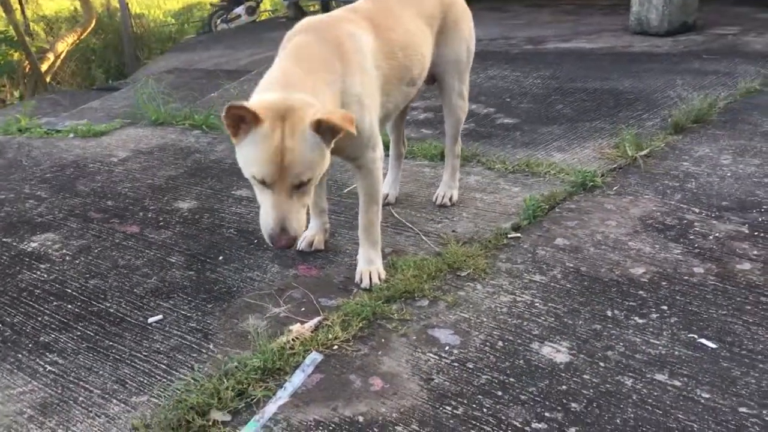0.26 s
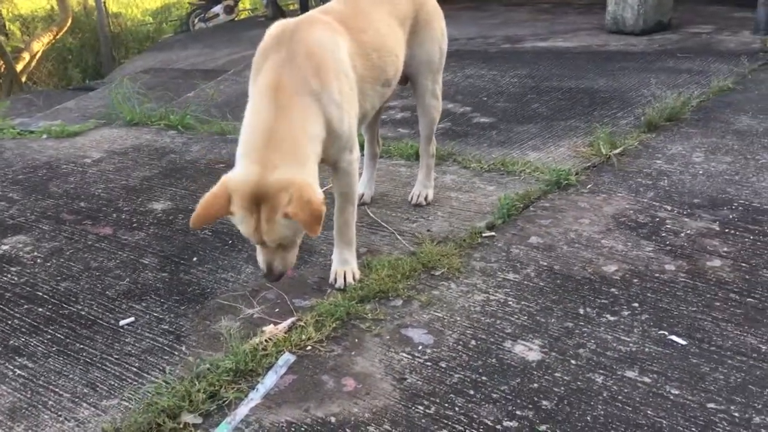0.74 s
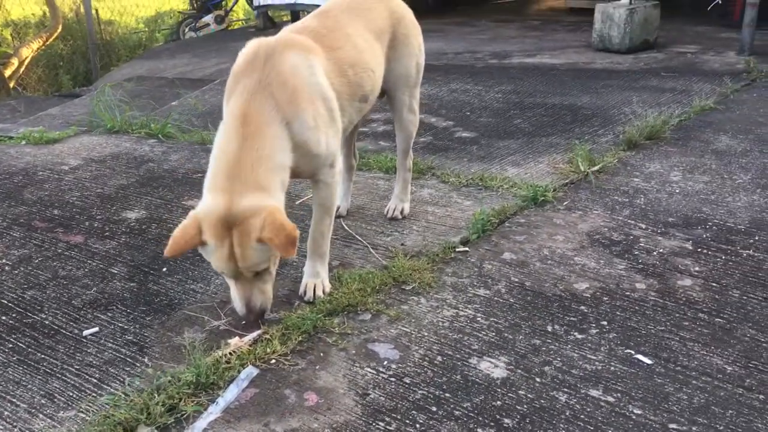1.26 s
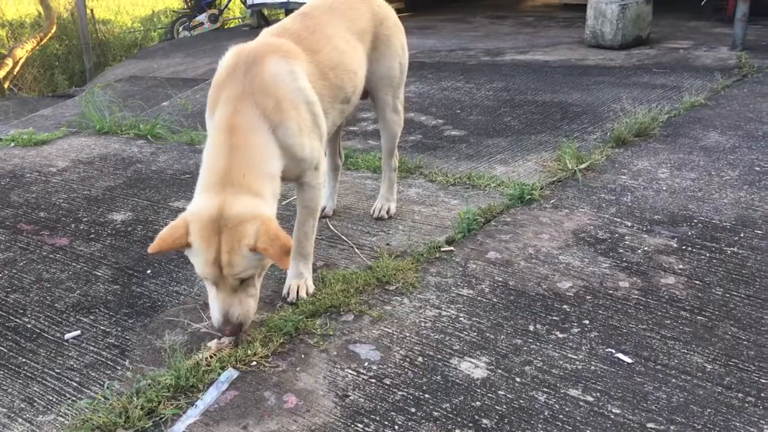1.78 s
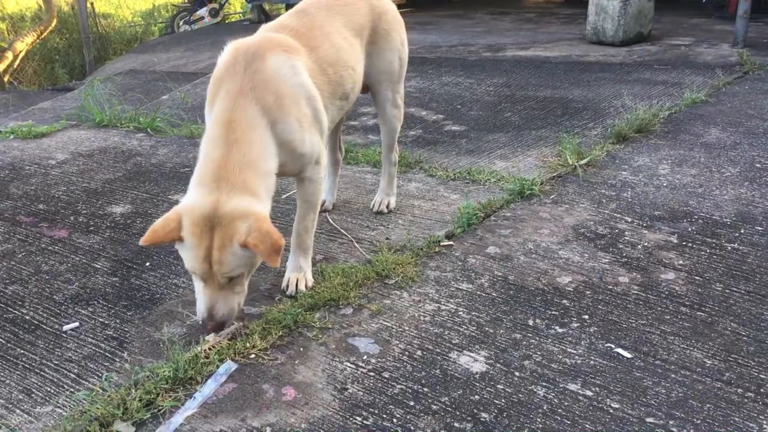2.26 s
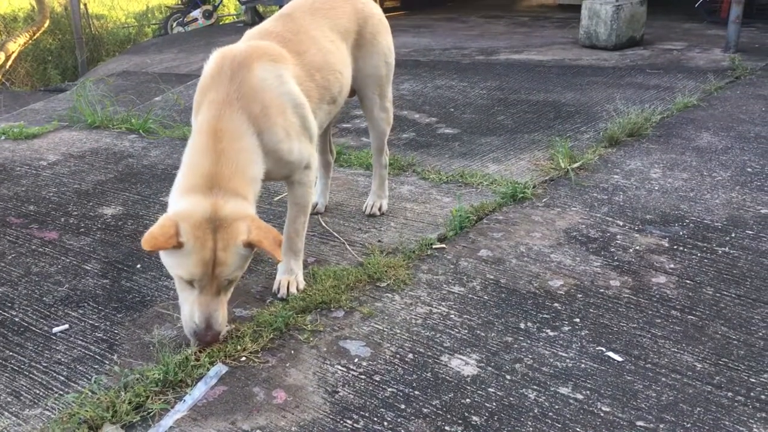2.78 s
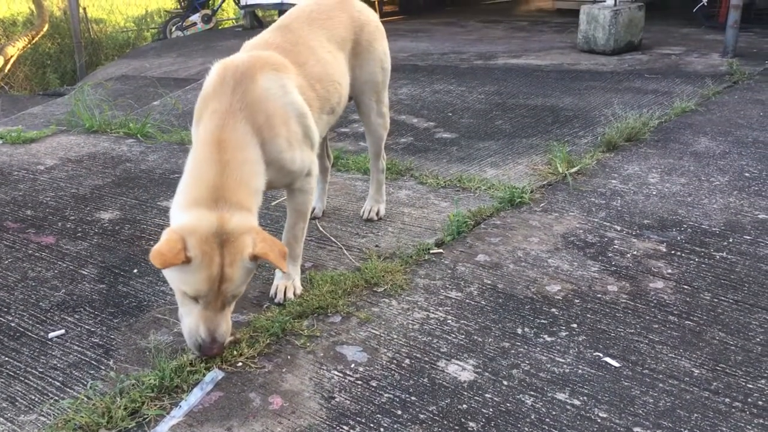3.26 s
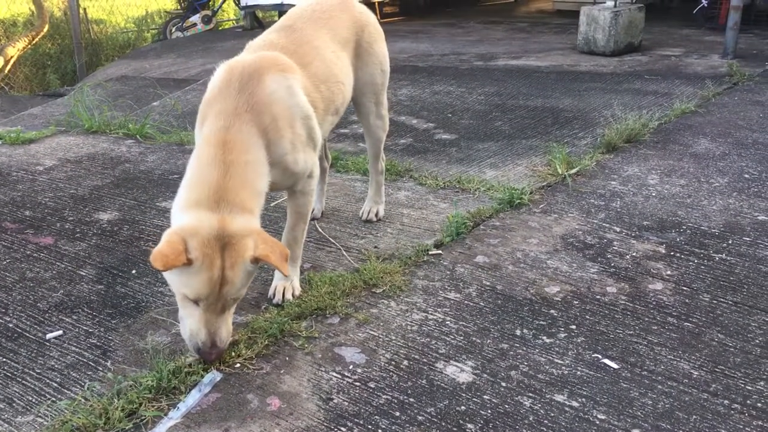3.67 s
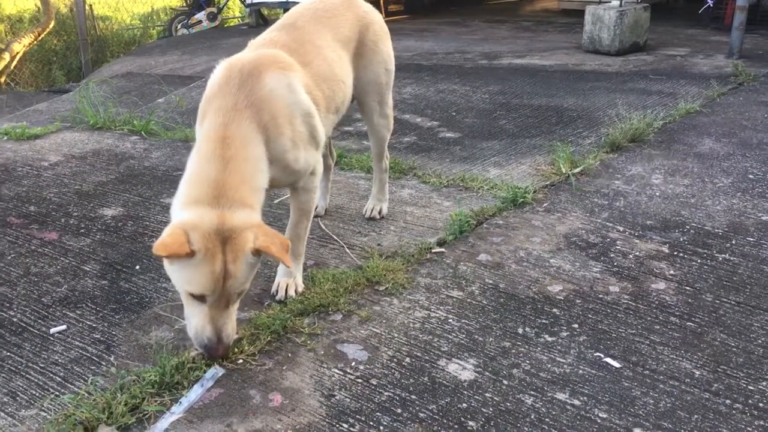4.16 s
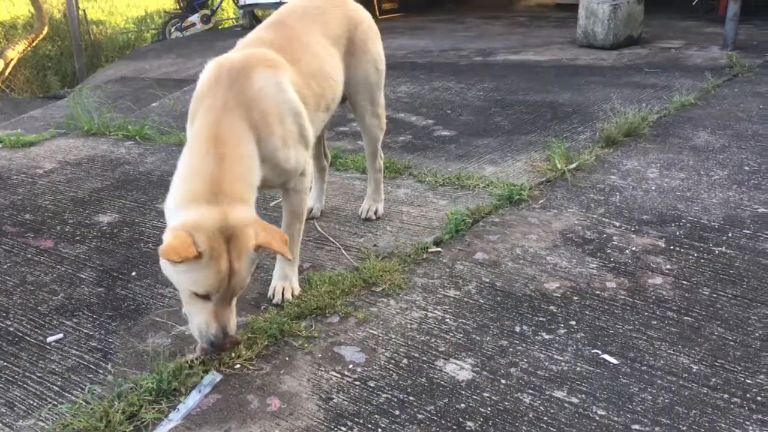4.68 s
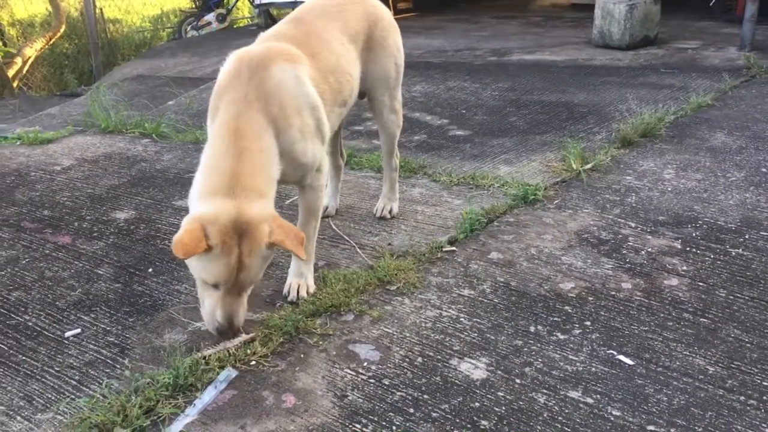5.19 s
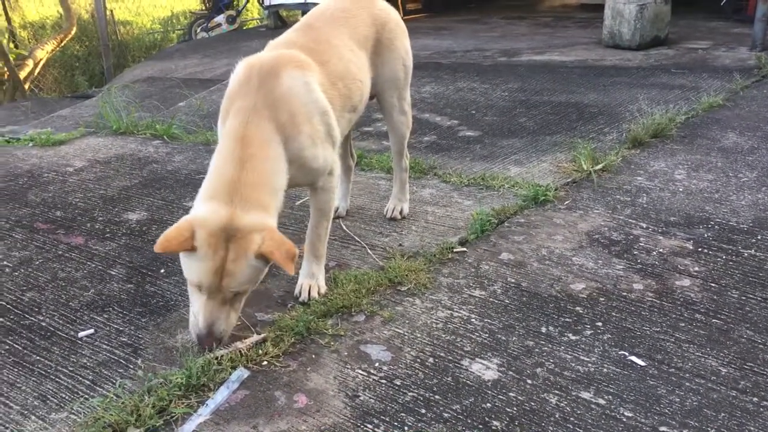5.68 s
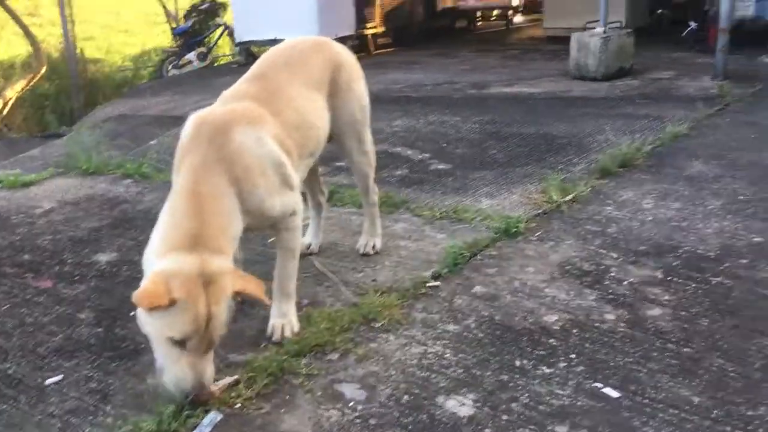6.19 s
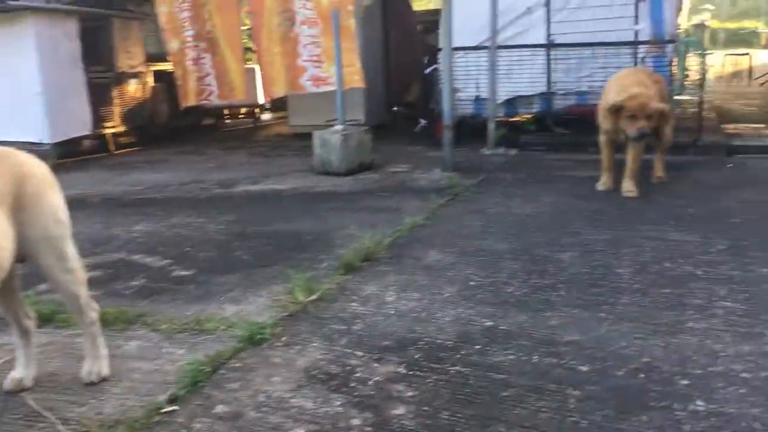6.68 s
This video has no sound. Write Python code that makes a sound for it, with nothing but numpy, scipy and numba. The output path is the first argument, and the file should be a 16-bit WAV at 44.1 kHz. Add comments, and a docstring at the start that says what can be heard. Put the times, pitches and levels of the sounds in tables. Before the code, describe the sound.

In a concrete yard, a dog nosing at scraps makes a few small dry clicks close to the microphone. Further off under a shed roof, a hollow object is knocked about in irregular clusters, with slaps and loose metal rattle, loudest past two and a half seconds and again past five. A bird whistles twice; a faint motor hum, rumble and insect hiss continue throughout.

```python
"""Small dry mouth clicks come first, close by: a dog noses at scraps in a concrete yard.
Further off, under a shed roof, something hollow is knocked, dragged and dropped among metal parts:
bursts of noise make its hollow body, its slap and the loose metal ring. A bird made of gliding
whistles calls twice, with fainter bird notes behind. A motor hums in wavering tones, and shaped
noise makes the distant rumble and the insects' hiss."""
import sys
import numpy as np
from scipy import signal
from scipy.fft import rfft, irfft
from scipy.io import wavfile
from scipy.ndimage import uniform_filter1d
from numba import njit

SR = 44100
rng = np.random.default_rng(int(sys.argv[2]) if len(sys.argv) > 2 else 0)


def wrap_up_sound(samples):
    """Save the sound to the file named by the first command line argument, as 16-bit audio."""
    columns = np.atleast_2d(samples).T
    # keep every value between -1 and 1, then stretch to whole-number steps
    tamed = np.clip(columns, -1, 1)
    steps = np.round(tamed * 32767).astype(np.int16)
    wavfile.write(sys.argv[1], SR, steps)


N = 306054
T = np.arange(N) / SR  # time, s


def undb(db):
    """Turn decibels into a plain amplitude factor."""
    return 10 ** (np.asarray(db) / 20)


def unit(x):
    """Scale to an rms of 1."""
    return x / np.sqrt(np.mean(x ** 2))


def colour(x, table):
    """Shape the spectrum along (f/Hz, level/dB) points."""
    hz, db = np.transpose(table)
    f = np.maximum(np.fft.rfftfreq(len(x), 1 / SR), 1)
    return irfft(rfft(x) * undb(np.interp(np.log(f), np.log(hz), db)), len(x))


@njit
def svf(x, hz, width):
    """State-variable band-pass with a moving centre, gain 1 at the centre."""
    y, b, l = np.empty(len(x)), 0., 0.
    for i in range(len(x)):
        g, k = np.tan(np.pi * hz[i] / SR), width / hz[i]
        v = (b + g * (x[i] + 1e-18 - l)) / (1 + g * (g + k))
        b, l, y[i] = 2 * v - b, l + 2 * g * v, k * v
    return y


def band(x, hz, width):
    """Band-pass with a fixed centre; a narrow band rings longer."""
    return svf(x, np.full(len(x), np.clip(hz, 20., .45 * SR)), max(1. * width, 5.))


def bank(x, peaks, struck_db=0):
    """Resonances side by side, neighbours in opposite phase; struck_db gives each its momentary share."""
    shares = np.broadcast_to(undb(struck_db), (len(peaks), len(x)))
    out = 0
    for k, (hz, width, db) in enumerate(peaks):
        out = out + (-1) ** k * undb(db) * band(x * shares[k], hz, width)
    return out


def walk(rate):
    """Random levels held 1 / rate s and slewed twice; spread near 1."""
    k = int(SR / rate)
    steps = np.repeat(rng.standard_normal(N // k + 1), k)
    return 1.28 * uniform_filter1d(uniform_filter1d(steps, k), k)[:N]


def grit(scatter_db):
    """Dense contacts whose sizes have a long tail."""
    return unit(rng.standard_normal(N) * undb(scatter_db * rng.exponential(size=N)))


# thump level of a middling knock, dB of thump per dB of knock, and the level of that middling knock
THUMP_DB, THUMP_SLOPE, MIDDLE_KNOCK_DB = -51, 0.55, -39
THUMP_PER_RATTLE = 0.22  # dB of thump per dB of rattle: what shakes the metal also lands heavily
FINE_RATTLE_DB, FINE_SLOPE = -7, .95  # fine rattle: offset in dB, and dB per dB of coarse rattle
# Knocks on the hollow thing; slap and rattle are relative to the knock's drive level:
# [t/s, drive level/dB, cavity f/Hz, slap level/dB, metal rattle level/dB, fading time/ms (at least 5)]
KNOCK_LIST = [(.74, -41.5, 830, -13, -34, 41), (.935, -44.5, 727, -22, -25, 19),
              (1.003, -45, 746, -20, -21, 16), (1.03, -48, 792, -17, -11, 29),
              (1.05, -42, 735, -22, -25, 25), (1.09, -42, 740, -21, -32, 23),
              (1.122, -42.5, 730, -22, -24, 14), (1.208, -46, 830, -23, -25, 26),
              (1.25, -31, 704, -23, -29, 13), (1.263, -28, 718, -4.5, -17.5, 15.7),
              (1.286, -32, 725, -9, -21, 16), (1.309, -41.5, 740, -6, -19, 54),
              (1.427, -34.5, 746, -9, -23, 40), (1.456, -29.5, 730, -5, -23.5, 25.6),
              (1.489, -47, 820, -8, -23, 26), (1.545, -34.5, 790, -0.5, -9, 25),
              (1.58, -38, 750, -10, -26, 23), (2.079, -37.5, 747, -7, -15.5, 42),
              (2.214, -40.5, 730, -15, -27, 29), (2.236, -39.5, 770, -3.5, -13.5, 39),
              (2.326, -42, 840, -10, -12, 300), (2.379, -33.5, 641, -7, -7.5, 39),
              (2.43, -35, 644, -19, -8, 12), (2.481, -36.5, 786, -7, -24, 68),
              (2.51, -40.5, 710, 1, -18, 220), (2.562, -33.5, 768, -18, -2.5, 26),
              (2.603, -33.5, 900, -3, -8, 40), (2.624, -28, 700, -2.7, -9.5, 55),
              (2.65, -20.5, 630, 3, 1.9, 15), (2.668, -27, 789, -1, -10.5, 43),
              (2.77, -35, 785, -1, -12, 60), (2.857, -48, 625, -0.5, -6, 135),
              (2.939, -53, 720, -9, -7, 30), (3.051, -45, 673, -21, -12, 13),
              (3.105, -45, 880, -4, -10, 35), (3.26, -45, 646, -9, -17, 56),
              (3.328, -49.5, 940, -4, -13, 74), (3.719, -47.5, 746, -1.5, -14, 32),
              (3.75, -43.5, 783, -6.5, -18, 120), (3.779, -35, 700, -12.5, -23, 36),
              (3.809, -32.5, 743, -13, -23, 19), (3.847, -30.5, 830, -8, -18.5, 21),
              (3.88, -34, 730, -6, -25, 29), (3.924, -35.5, 744, -1, -18, 23),
              (3.997, -39, 766, -11, -19, 27), (4.06, -40.5, 756, -9, -23, 26),
              (4.083, -44, 730, 0.5, -11, 44), (4.144, -32.5, 722, -13, -24, 57),
              (4.179, -32, 720, -5.5, -21, 25), (4.239, -32, 725, -5.5, -22, 24),
              (4.267, -31, 793, -6, -26, 12), (4.505, -58, 640, 5.5, 3, 40),
              (4.657, -43, 626, -18, -27, 12), (4.808, -56, 800, 6.5, -17, 32),
              (4.923, -59, 899, -14, 11.5, 41), (4.96, -46.5, 690, -1, -2.5, 22),
              (4.978, -37.5, 660, -9, -24, 74), (5.064, -36, 770, -11, -26, 38),
              (5.11, -45.5, 740, -7, -18, 53), (5.171, -34, 655, -3.5, -30, 36),
              (5.184, -21.5, 812, -1.7, -7, 25.7), (5.218, -21.5, 727, -6, -38, 24),
              (5.238, -24, 710, 4.5, -9.5, 16), (5.252, -23, 730, -1, -10.5, 16),
              (5.298, -26.5, 688, 0.3, -12, 31), (5.34, -35, 677, -1.2, -21, 19),
              (5.382, -29.5, 719, -2.5, -20.5, 24.7), (5.458, -49, 720, -2, -5, 83),
              (5.527, -49, 654, 1, -1.5, 41), (5.595, -37.5, 690, -11, -27, 28),
              (5.988, -48.5, 780, -2, -7, 22), (6.045, -43.5, 660, -4, -9.5, 29),
              (6.073, -41.5, 693, -1.5, -13.5, 28), (6.159, -54, 635, 1.7, -8.5, 150)]


def knocks():
    """Each knock is a blow and a fading rattle of contacts that drive the cavity, the shell and loose metal."""
    s, db, hz, slap_db, metal_db, length_ms = np.transpose(KNOCK_LIST)
    # the weight that lands grows more slowly than the knock
    thump_db = THUMP_DB + THUMP_SLOPE * (db - MIDDLE_KNOCK_DB) + THUMP_PER_RATTLE * metal_db
    fine_db = FINE_SLOPE * metal_db + FINE_RATTLE_DB
    levels_db = np.array([db, db + slap_db, db + metal_db, db + fine_db, thump_db])
    # build-up times in s: the loose metal takes longer to start chattering than the shell
    gather = np.array([[.003], [.004], [.007], [.007], [.005]])
    power, blow = np.zeros((5, N)), np.zeros(N)
    for k in range(len(s)):
        i = int((s[k] - .004) * SR)
        age = T[:min(SR // 2, N - i)]
        fade = np.exp(-(age / max(length_ms[k] / 1000, .005)) ** 0.92)
        shape = (1 - np.exp(-age / gather)) * fade
        power[:, i:i + len(age)] += (undb(levels_db[:, k:k + 1]) * shape) ** 2
        blow[i:i + 24] += undb(db[k]) * np.hanning(24)
    push = np.sqrt(power) * undb(1.64 * walk(150))
    body_push, slap_push, coarse_push, fine_push, thump_push = push

    # which knock came last, at every sample
    now = np.clip(np.searchsorted(s - .004, T) - 1, 0, None)
    # every knock lands elsewhere, so it wakes the modes in other shares
    struck = rng.standard_normal((len(s), len(HOLLOW_MODES) + len(METAL_MODES))).T[:, now]
    hollow_struck, metal_struck = struck[:len(HOLLOW_MODES)], struck[len(HOLLOW_MODES):]
    slap_blow = undb(slap_db[now]) * np.gradient(blow)
    return (hollow_thing(body_push, slap_push, thump_push, blow, hz[now], hollow_struck)
            + slap(body_push, slap_push, slap_blow)
            + loose_metal(coarse_push, fine_push, metal_struck))


# Notes the hollow shell rings at: [f/Hz, width/Hz, relative level/dB]
HOLLOW_MODES = [(237.4, 9.5, -10), (319, 47, -7.5), (356, 46, -13.5), (447, 25, -18.5), (587, 42, -14),
                (666, 48, -7), (729, 18.5, -3.5), (792.5, 23, -5.5), (828, 41, -10.5), (974, 40, -15.5),
                (1053, 19.4, -7.5), (1146, 21.4, -7.5), (1216, 18, -6.5), (1312, 21, -13),
                (1600, 3.1, -12.5), (1690, 53, -10.5), (1833, 33, -12.5), (1850, 58, -10),
                (1990, 38, -13.5), (2094, 65, -12.5), (2360, 47, -15), (2565, 85, -16), (2827, 26, -15.5),
                (3045, 30, -11), (3070, 22, -40)]


def hollow_thing(body_push, slap_push, thump_push, blow, cavity_hz, struck):
    """The air inside rings at one moving pitch, the shell around it at many fixed ones."""
    body = body_push * grit(1.13) + undb(2.5) * blow
    # the cavity pitch steps from knock to knock as the thing tilts
    cavity = svf(body, cavity_hz, 43.5) * undb(15.0)
    split = sum(mode[0] < 1400 for mode in HOLLOW_MODES)
    middle = bank(body, HOLLOW_MODES[4:split], 3 * struck[4:split]) * undb(16.5)
    # the deepest modes answer to the weight that lands on the ground
    thump = thump_push * grit(2.1)
    deep = bank(thump, HOLLOW_MODES[:4], 3 * struck[:4]) * undb(32.5)
    deep += band(band(thump, 200, 230), 206, 330) * undb(16.5)
    high = bank(slap_push * grit(2.88), HOLLOW_MODES[split:], 4 * struck[split:]) * undb(17.5)
    return cavity + middle + deep + high


# Tone colour of the dull contact noise: [f/Hz, relative level/dB per Hz]
SLAP_COLOUR = [(71, -53), (120, -23), (341, -3.5), (524, -10.5), (712, -13), (1460, -8.5), (1900, -10.5),
               (7050, -18), (10200, -29), (12300, -22), (16000, -23.5)]


def slap_noise(x):
    """Give contact noise the slap colour, at a gain that keeps white noise at an rms near 1."""
    return colour(x, SLAP_COLOUR) / np.std(colour(rng.standard_normal(N), SLAP_COLOUR))


def slap(body_push, slap_push, slap_blow):
    """Broad contact noise without a clear pitch: a low thud and a brighter slap."""
    thud = band(band(slap_noise(body_push * grit(1.6)), 730, 750), 770, 990)
    bright = band(slap_noise(slap_push * grit(0.96) + slap_blow), 1640, 2640)
    return thud * undb(-5.5) + bright * undb(-2.5)


# Notes the loose metal rings at: [f/Hz, width/Hz, relative level/dB]
METAL_MODES = [(4190, 200, 2.5), (5070, 270, 9), (5290, 220, 3.5), (6150, 31, -1), (5800, 120, 10),
               (7000, 380, 11.5), (8000, 79, -27), (9300, 110, -33), (11730, 220, -8), (12300, 160, -9),
               (13600, 250, -13), (14300, 250, -1)]


def loose_metal(coarse_push, fine_push, struck):
    """Chattering contacts ring the metal's modes: a coarse rattle lower down, a fine one higher up."""
    rattle, fine = coarse_push * grit(0.38), fine_push * grit(0.44)
    coarse_metal = bank(rattle, METAL_MODES, 4.3 * struck) * undb(3.0)
    coarse_metal += slap_noise(rattle) * undb(2.0)
    fine_metal = bank(fine, METAL_MODES, 6.1 * struck) * undb(4.5)
    fine_metal += slap_noise(fine) * undb(15.5)
    return (band(band(coarse_metal, 4420, 3300), 4300, 5800)
            + band(band(fine_metal, 10900, 11000), 9600, 14600))


DRAG_S, DRAG_DB, DRAG_ATTACK_S, DRAG_HOLD_S = 2.318, -47, .008, 0.13
DRAG_SWELL_DB, DRAG_RELEASE_DB_PER_S = 3, 270
# Singing bands of the dragged edge: [f/Hz, width/Hz, relative level/dB]
EDGE_BANDS = [(2490, 200, 4), (4120, 180, 1.5), (5600, 300, -5), (6270, 320, 3), (6600, 300, -3),
              (11270, 230, -1)]


def drag():
    """Friction noise in the singing bands of the edge: it catches, swells while held and dies away."""
    age = T - DRAG_S
    catch = np.clip(age / DRAG_ATTACK_S, 0, 1)
    swell_db = DRAG_SWELL_DB * np.clip(age / DRAG_HOLD_S, 0, 1)
    release_db = DRAG_RELEASE_DB_PER_S * np.maximum(age - DRAG_HOLD_S, 0)
    level_db = DRAG_DB + swell_db - release_db + 0.8 * walk(39.2)
    return unit(bank(grit(2.3), EDGE_BANDS)) * catch * undb(level_db)


CHATTER_S, CHATTER_RISE_S = .022, .008
# Taps on a small solid metal piece, then on a thinner one: [t/s, level/dB, brightness/dB per octave]
CLINK_TAPS = [(2.08, -60, 2.1), (4.503, -54, 1.1)]
TINK_TAPS = [(1.0061, -55, 1.5)]
# Notes of the solid piece, then of the thinner one: [f/Hz, relative level/dB, time to fade 60 dB/s]
SOLID_MODES = [(3220, -1, .05), (4020, 2, 0.073), (5500, 1, .04), (6730, 3, .07), (9430, 2, .07),
               (11750, 1, .08), (13650, -5, .05)]
THIN_MODES = [(6150, -4, .08), (7700, -5, .06), (10150, 0, .05), (10550, -1, .05), (10850, -7, .04),
              (15300, -10, .05)]


def clinks(taps, modes):
    """Modes of a small metal piece that chatters for a moment before it rings out."""
    out = np.zeros(N)
    for s, db, tilt_db in taps:
        age = np.maximum(T - s + 0.0047, 0)
        chatter = grit(3.0) * (1 - np.exp(-age / CHATTER_RISE_S)) * np.exp(-age / CHATTER_S)
        for hz, mode_db, t60 in modes:
            ring = band(chatter, hz, np.log(1000) / np.pi / t60)  # width that fades 60 dB in t60
            level_db = db + mode_db + tilt_db * np.log2(hz / 8000)
            out += ring / np.abs(ring).max() * undb(level_db)
    return out


# Mouth and grit clicks close by: [t/s, peak level/dB, f/Hz, width as a share of f]
CLICK_LIST = [(.0095, -34.5, 2580, 0.68), (.2413, -43.5, 7200, 0.17), (.2691, -33, 7900, 3.7),
              (0.3, -37, 1560, 0.19), (0.32, -49, 2500, 0.98), (.3525, -51, 2500, .8),
              (.78, -46, 7450, 1.3), (.8, -47, 9000, 1.1), (.845, -47, 10000, 1.3), (.865, -52, 12000, .8),
              (3.395, -56, 12500, .55), (3.71, -47, 8000, .7), (5.9717, -43, 3470, .76),
              (6.251, -41.5, 3000, 0.54), (6.4875, -46.5, 980, .52), (6.6596, -48, 6000, .55)]


def clicks():
    """Each click is a very short noise burst, ringing a few cycles in a small wet gap."""
    out, age = np.zeros(N), np.arange(512) / SR
    for s, db, hz, share in CLICK_LIST:
        burst = rng.standard_normal(512) * np.exp(-age / .0011)
        ring = band(band(burst, hz, hz * share), hz, 4.5 * hz * share)
        i = int(s * SR) - 10
        out[i:i + 512] += undb(db) * ring / np.abs(ring).max()
    return out


WARBLE_HZ = 85


def bird(notes, flutter_db, waver_share, warble_share):
    """Whistles with a quick flutter, a waver and any warble, thickened by a close ground reflection."""
    out, flutter, waver = np.zeros(N), walk(200), walk(170)
    warble = np.sin(2 * np.pi * WARBLE_HZ * T)
    for note in notes:
        s, hz, db = np.transpose(note)
        edge = np.clip(np.minimum(T - s[0], s[-1] - T) / 0.0018, 0, 1)
        pitch = np.interp(T, s, hz) * (1 + waver_share * waver + warble_share * warble)
        phase = 2 * np.pi * np.cumsum(pitch) / SR
        loudness = undb(np.interp(T, s, db) + flutter_db * flutter)
        out += np.sqrt(2) * edge * loudness * np.sin(phase)
    return out + 0.31 * np.roll(out, int(0.0059 * SR))


# The near bird's phrase, three notes, each a list of points: [t after the start/s, f/Hz, level/dB]
NEAR_PHRASE = [
    [(0, 2646, -53), (.01, 2720, -48), (.024, 2740, -47), (.038, 3080, -53)],
    [(.025, 3200, -44), (.031, 3406, -45), (.038, 3300, -47), (.042, 3277, -47), (.055, 3350, -43),
     (.068, 3180, -54), (.079, 3300, -67)],
    [(.166, 2300, -65), (.175, 2380, -49.5), (.19, 2570, -51.5), (.21, 2615, -53), (.233, 2460, -52.5),
     (.26, 2180, -57.5), (.292, 2000, -66)],
]
# When the phrase is sung: [t/s, level change/dB, extra change of the first note/dB]
NEAR_CALLS = [(.83, -3, 0.5), (5.425, 1.5, -7.5)]


def near_notes():
    """The phrase at each of its times, the first note given more or less breath."""
    notes = []
    for start, level_db, first_db in NEAR_CALLS:
        for k, note in enumerate(NEAR_PHRASE):
            change_db = level_db + (first_db if k == 0 else 0)
            notes.append([(start + s, hz, db + change_db) for s, hz, db in note])
    return notes


FAR_RISE_SHARE, FAR_RISE_DB, FAR_FADE_DB = .25, -5.5, -6.5  # levels at start and end, against the top
# A fainter bird further off: [t/s, length/s, start f/Hz, end f/Hz, top level/dB]
FAR_CALLS = [(0.438, 0.19, 3260, 3150, -67), (1.593, 0.23, 4000, 3800, -73), (1.655, .105, 3390, 3330, -74),
             (1.775, 0.095, 2920, 2440, -70), (3.337, .11, 2610, 2490, -66.5), (4.4, 0.15, 2450, 2450, -92),
             (6.55, .21, 2820, 2400, -72)]


def far_notes():
    """Each note holds its pitch while it grows louder, then slides and fades."""
    return [[(s, hz, db + FAR_RISE_DB),
             (s + FAR_RISE_SHARE * length, hz, db),
             (s + length, end_hz, db + FAR_FADE_DB)]
            for s, length, hz, end_hz, db in FAR_CALLS]


# How fast the echoes die: [f/Hz, time to fade 60 dB/s]
SHED_FADE = [(300, 0.46), (1000, 0.35), (4000, 0.6), (12000, 0.23)]


def shed(x):
    """Diffuse echoes from roof and walls, as noise in octave bands; the very top dies first."""
    age, tail = T[:SR], 0
    hz, t60 = np.transpose(SHED_FADE)
    for centre in 125 * 2. ** np.arange(7.5):
        fade = undb(-60 * age / np.interp(np.log(centre), np.log(hz), t60))
        tail = tail + fade * band(rng.standard_normal(SR), centre, centre * 0.51)
    tail = tail * np.clip(age / 0.0086, 0, 1)
    return signal.fftconvolve(x, tail / np.sqrt(np.sum(tail ** 2)))[:N]


# The motor's tones: [f/Hz, level/dB rms], both before they waver
HUM_TONES = [(53.5, -60), (107, -79.5), (160, -74.5), (270, -77.5)]


def hum():
    """A motor's tones, wavering in speed and strength."""
    turn = 2 * np.pi * np.cumsum(1 + 0.0115 * walk(3.6)) / SR  # shared, so all tones bend together
    return sum(np.sqrt(2) * undb(db + 0.6 * walk(10)) * np.sin(hz * turn) for hz, db in HUM_TONES)


AIR_DB = -57.5  # rms, before it swells
# Tone colour of the distant noise: [f/Hz, relative level/dB per Hz]
AIR_COLOUR = [(30, -9), (46, -17), (64, -2.5), (81, -9.5), (118, -10.5), (190, -17.5), (266, -19.5),
              (570, -23), (1010, -22), (1700, -27), (2900, -28.5), (3900, -31), (6300, -38), (9500, -37.5),
              (16000, -45)]
# Insect choruses: [f/Hz, width/Hz, level/dB rms before it wavers]
INSECT_BANDS = [(2460, 580, -73), (4916, 950, -68.5), (7050, 240, -82.5), (8310, 1600, -71),
                (10530, 2300, -77.5)]


def air():
    """Distant rumble and hiss, the bass swelling unevenly; insect choruses as noise in bands."""
    wash = unit(colour(rng.standard_normal(N), AIR_COLOUR))
    low = band(wash, 270, 270)
    out = (wash + low * (undb(3.5 * walk(3.1)) - 1)) * undb(AIR_DB + .5 * walk(0.93))
    for hz, width, db in INSECT_BANDS:
        chorus = unit(band(band(rng.standard_normal(N), hz, width), hz, width))
        out = out + chorus * undb(db + 1.15 * walk(6.9))
    return out


def scene():
    """Mix the far knocking, the birds and the near clicks with their echoes, the hum and the air."""
    far = knocks() + drag() + clinks(CLINK_TAPS, SOLID_MODES) + clinks(TINK_TAPS, THIN_MODES)
    song = bird(near_notes(), 2.06, .014, 0.019) + bird(far_notes(), 4.2, .03, 0)
    near = clicks()
    wet = shed(undb(-10.5) * far + undb(-18.0) * song + undb(-12.0) * near)
    return (far * undb(-2.5) + song + near + wet + hum() + air())[None]


def record(dry):
    """Filters cut the deepest bass below 42 Hz and, steeply, the top above 15850 Hz."""
    x = signal.sosfilt(signal.butter(3, 42, "high", fs=SR, output="sos"), dry)
    return signal.sosfilt(signal.ellip(12, .2, 80, 15850, fs=SR, output="sos"), x)


dry = scene()
out = record(dry)
wrap_up_sound(out)
```